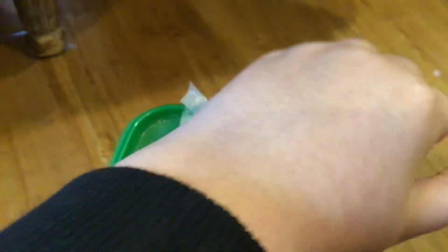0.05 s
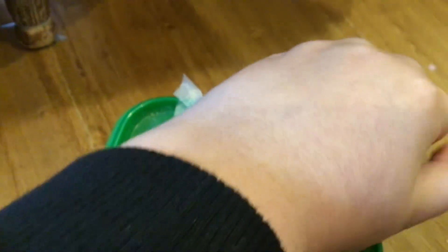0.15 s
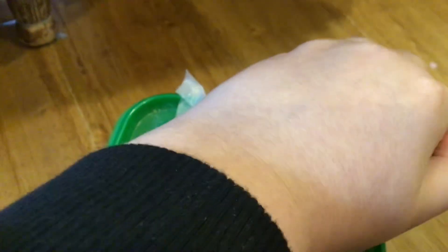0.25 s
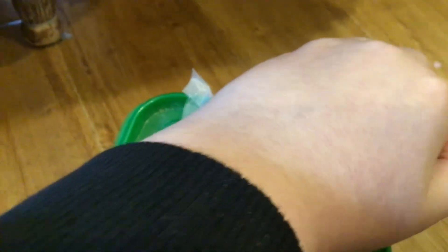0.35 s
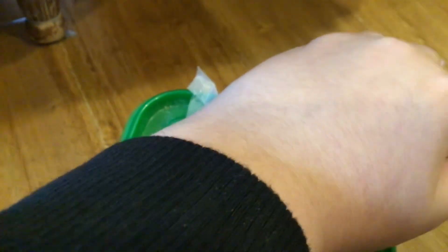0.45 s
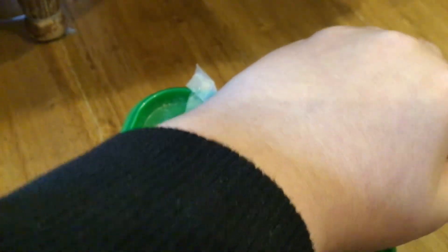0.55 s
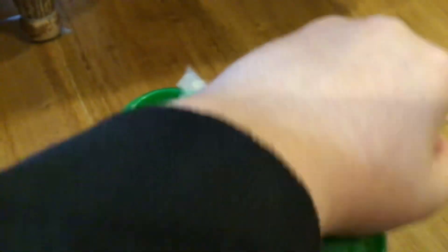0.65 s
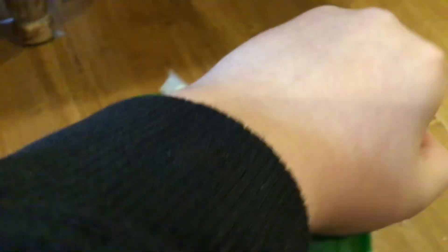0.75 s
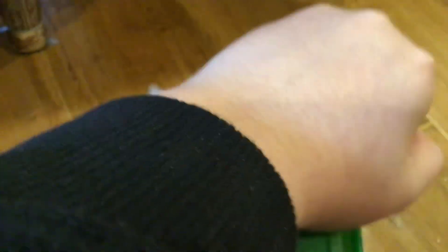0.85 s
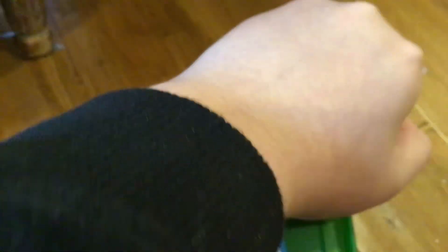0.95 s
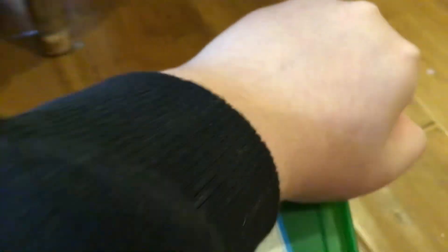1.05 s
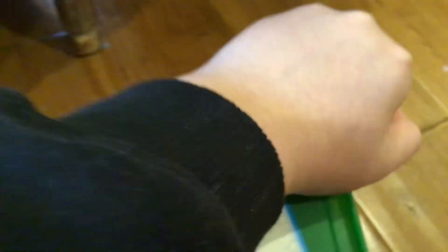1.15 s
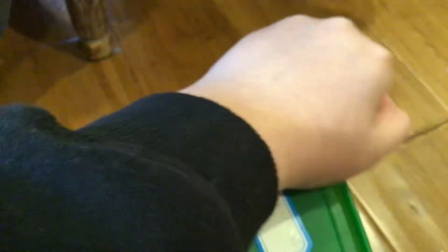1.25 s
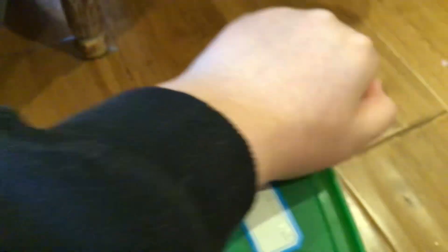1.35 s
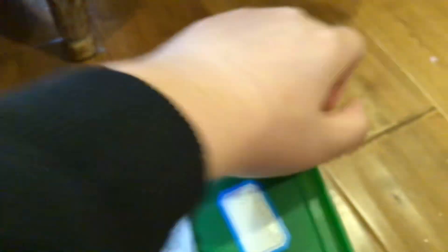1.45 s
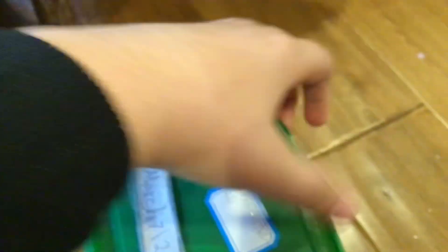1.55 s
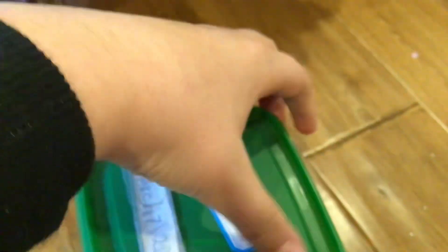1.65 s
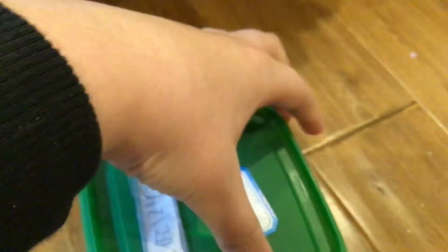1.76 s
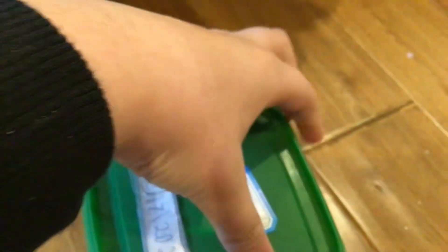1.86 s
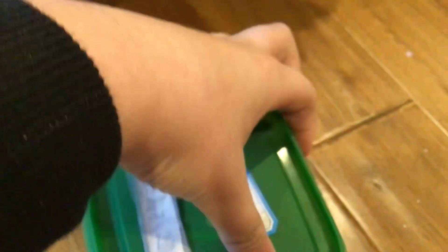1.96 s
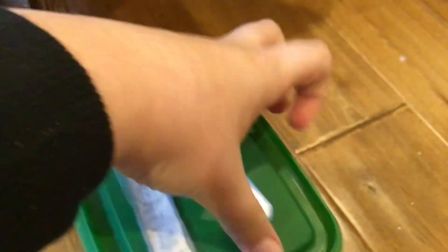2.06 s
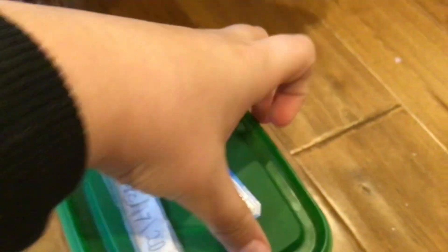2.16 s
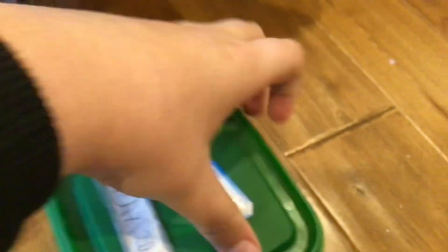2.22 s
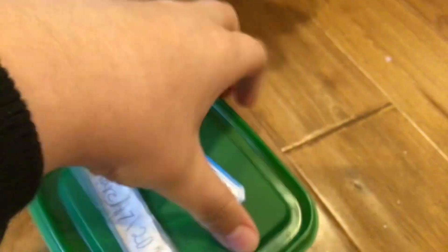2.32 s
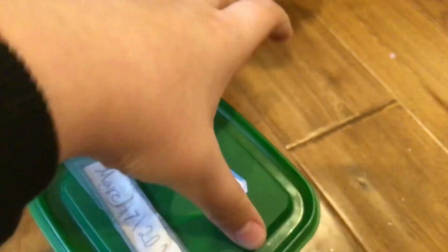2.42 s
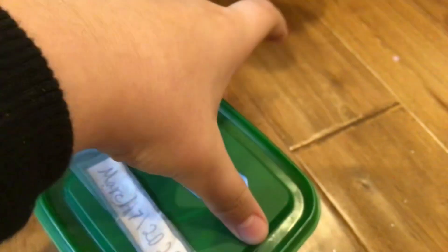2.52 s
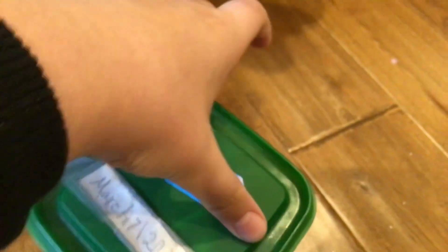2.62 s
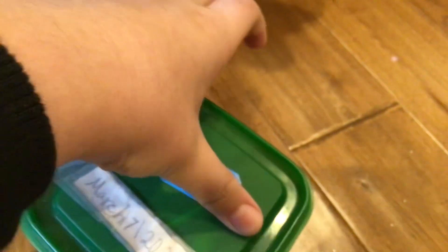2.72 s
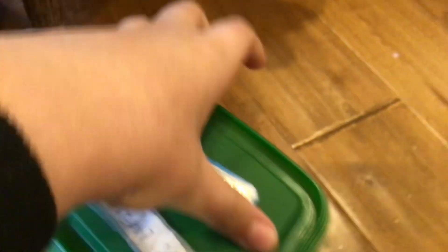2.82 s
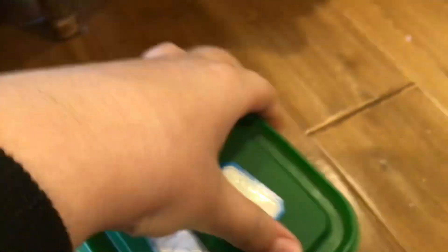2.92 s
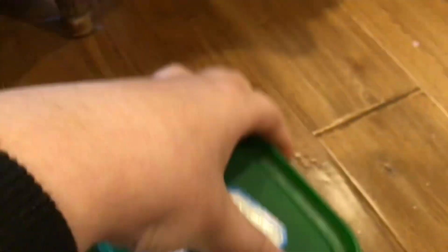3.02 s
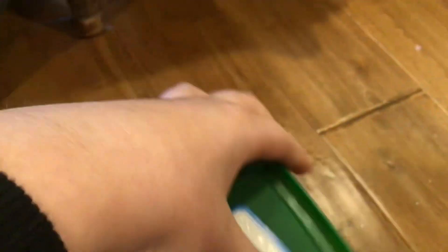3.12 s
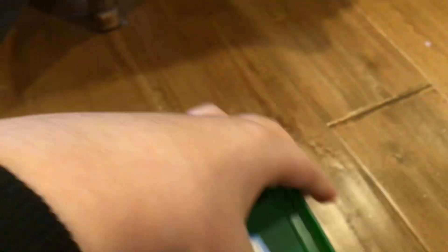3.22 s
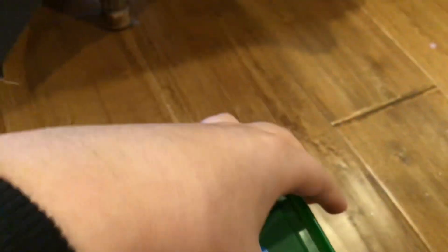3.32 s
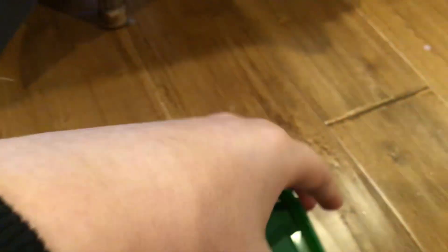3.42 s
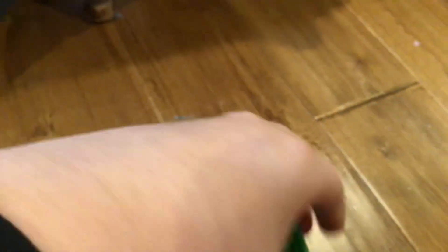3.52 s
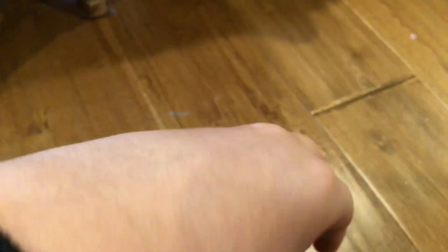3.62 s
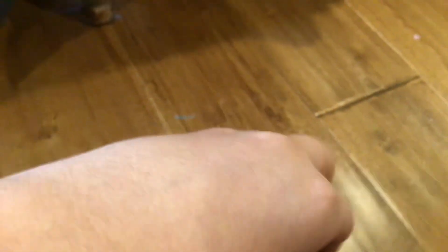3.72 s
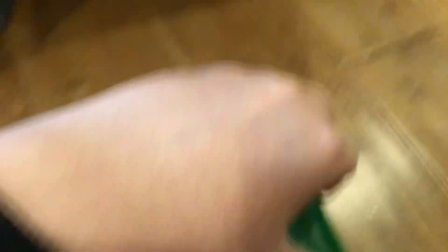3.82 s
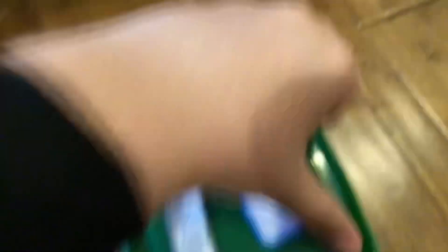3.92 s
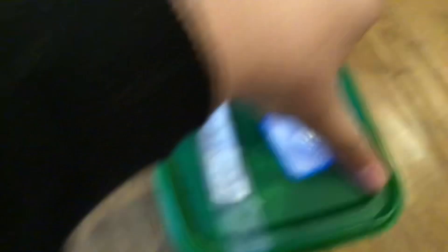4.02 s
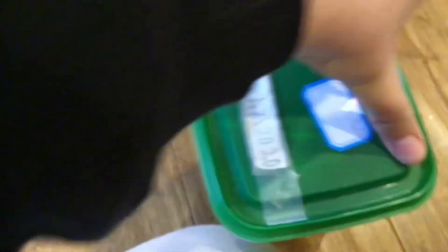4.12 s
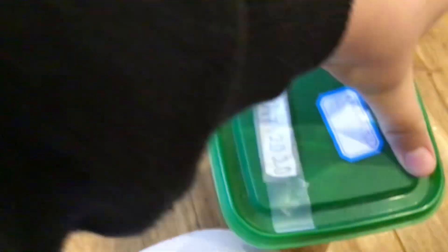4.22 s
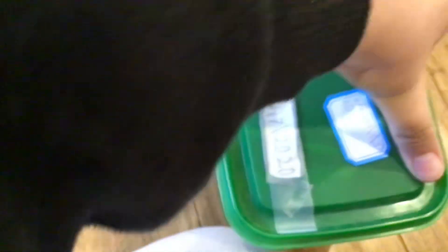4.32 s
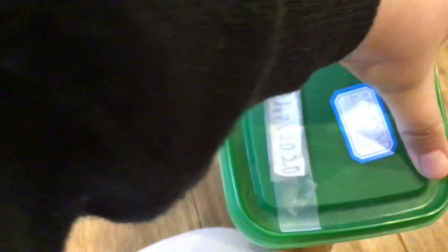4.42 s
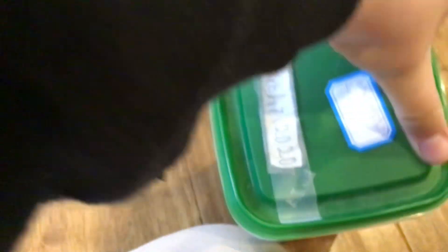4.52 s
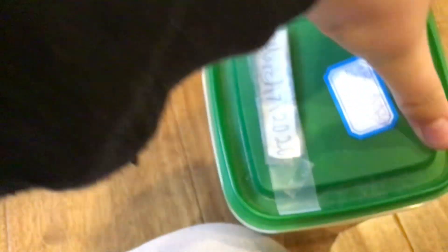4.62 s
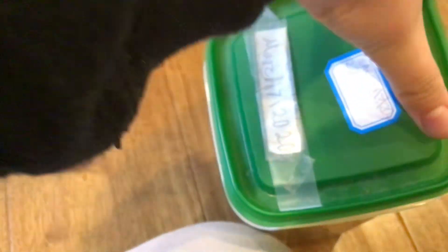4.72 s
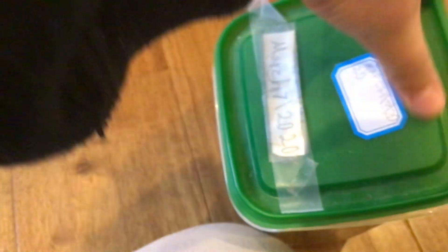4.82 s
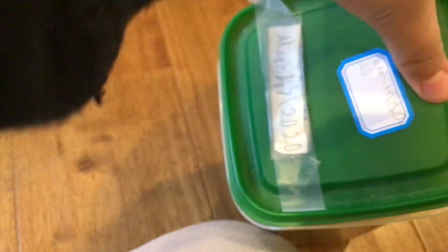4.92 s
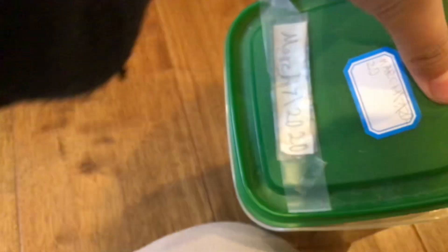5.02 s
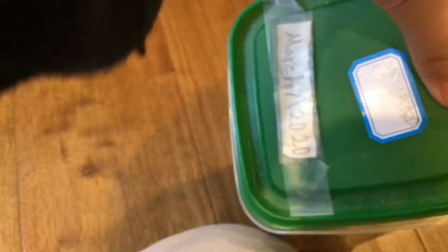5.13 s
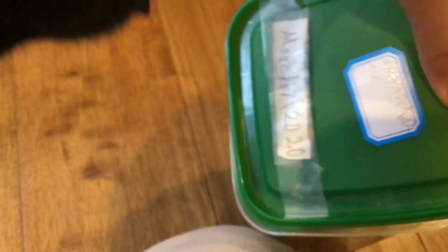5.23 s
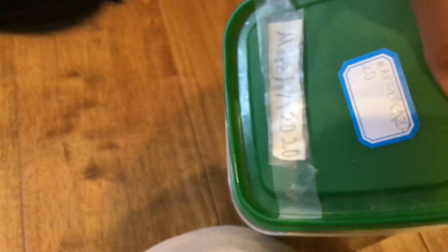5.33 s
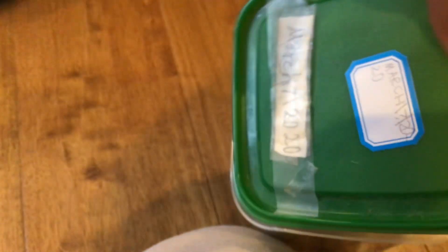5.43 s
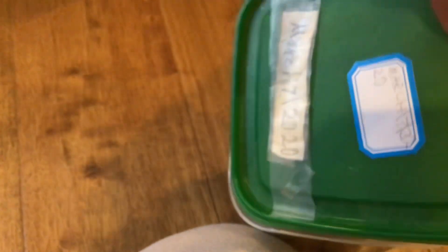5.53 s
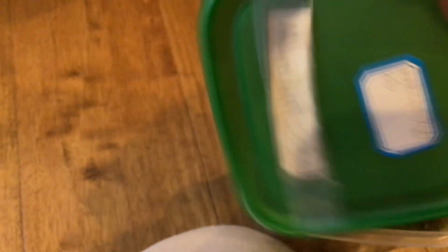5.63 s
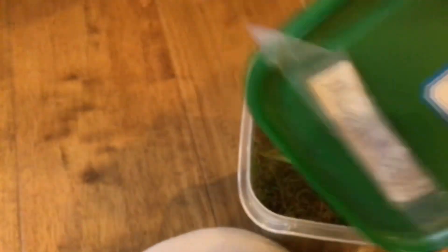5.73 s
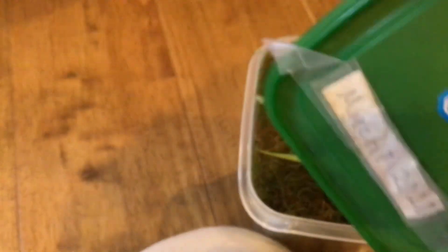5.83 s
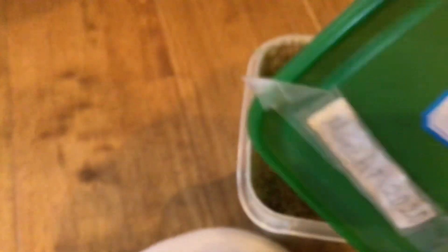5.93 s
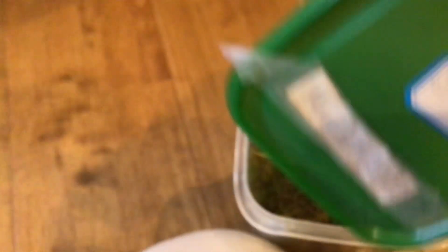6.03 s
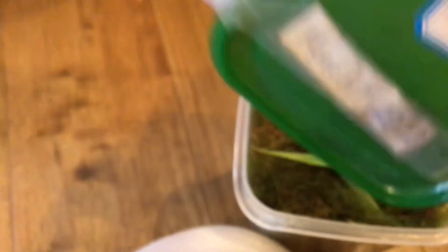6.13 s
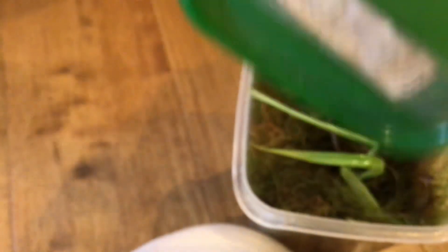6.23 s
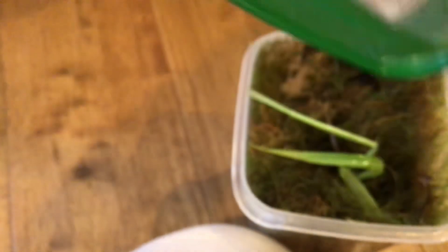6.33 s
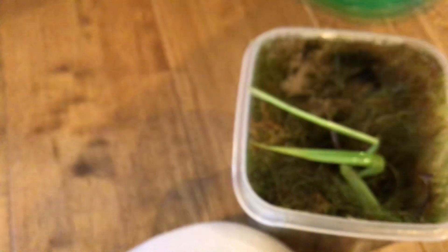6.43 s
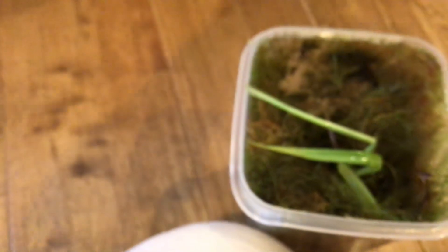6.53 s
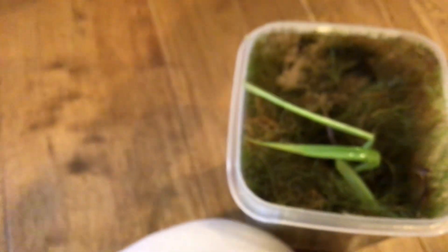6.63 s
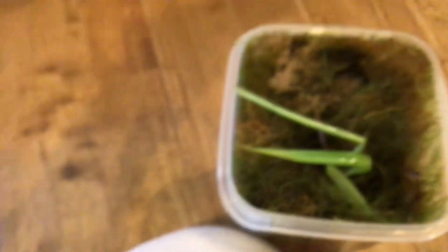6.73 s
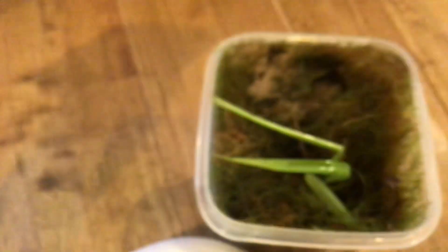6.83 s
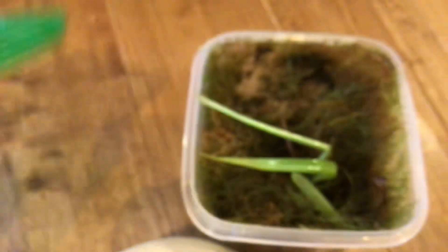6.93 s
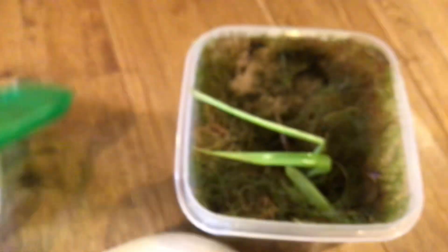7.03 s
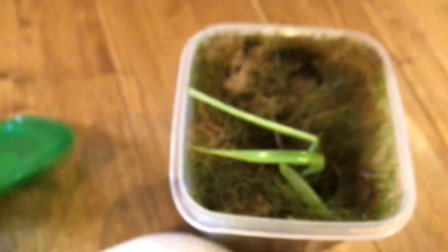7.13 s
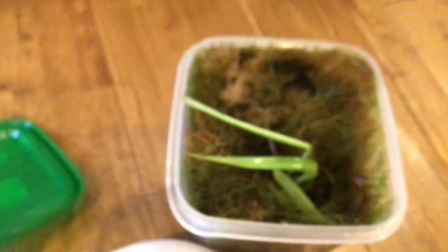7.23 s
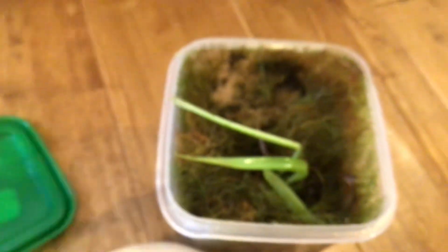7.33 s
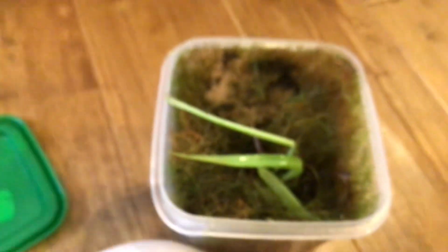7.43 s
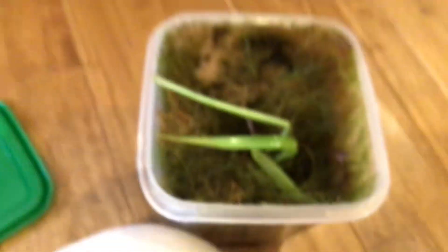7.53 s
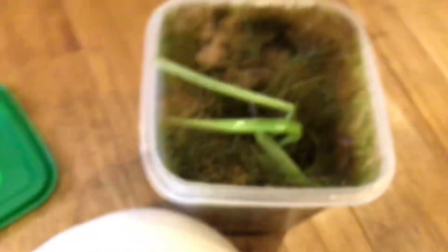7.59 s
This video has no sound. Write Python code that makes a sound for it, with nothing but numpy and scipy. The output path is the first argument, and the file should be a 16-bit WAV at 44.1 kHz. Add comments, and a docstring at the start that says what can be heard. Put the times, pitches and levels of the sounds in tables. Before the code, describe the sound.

Close phone pickup in a small, quiet indoor room, with faint air and low hand rumble. From 0 to 1.4 s a knitted sleeve brushes by in uneven soft rustles, strongest around 0.7 s, with small ticks and dull taps. From 1.4 s fingers feel over a hollow plastic lid: rubbing hiss, creaky panel tones, light pats, and a heavy low double thud near 2.1 s. Busier bumps and slides run from 2.7 to 3.8 s, then sparser knocks around 4.2-4.7 s. After a lull, the rim pops at 5.65-5.75 s in a cluster of hollow knocks, snaps and scraping, trailing light scrapes and sharp ticks to 6.1 s. Near quiet until 7.15 s, when the hard plastic lid slaps wooden boards, then rattles rapidly and brightly at 7.35-7.55 s with a short reverberant tail. A deep thump and brief rub end it at 7.62 s.

```python
"""Working the snap-on lid off a plastic box

A hand works the lid off a plastic food box on a wooden floor, close to a phone. A sleeve brushes past,
fingers rub, knock and tick until the rim pops free; the lid clatters on the boards of a small room.
Blows are short swelling sines that ring panel modes; hard touches are coloured noise bursts.
Friction is random slips shaped stroke by stroke, and the rim's snaps are decaying sines.
A diffuse noise tail makes the room, over quiet air and the rumble of the hand holding the phone."""
import sys
import numpy as np
from scipy import signal
from scipy.fft import rfft, irfft
from scipy.io import wavfile
from scipy.ndimage import uniform_filter1d, map_coordinates

SR = 44100
rng = np.random.default_rng(int(sys.argv[2]) if len(sys.argv) > 2 else 0)


def inscribe(sig):
    """Save sig as 16-bit PCM at rate SR to the path in sys.argv[1].

    A 1-D sig is mono; a 2-D sig holds one channel per row.
    Samples are clipped to [-1, 1] before scaling.
    """
    pcm = np.round(np.clip(np.atleast_2d(sig).T, -1, 1) * 32767)
    wavfile.write(sys.argv[1], SR, pcm.astype(np.int16))


N = 337790
TIME = np.arange(N) / SR


def undb(db):
    """Logarithmic level: convert decibels to amplitude gain."""
    return 10 ** (np.asarray(db) / 20)


def unit(x):
    """Normalisation: scale to rms 1."""
    return x / np.sqrt(np.mean(x ** 2))


def add(track, s, sound):
    """Superposition: mix a sound into a track at time s."""
    start = max(int(s * SR), 0)
    part = sound[:max(N - start, 0)]
    track[start:start + len(part)] += part


def response(points, size=2048):
    """Minimum phase: the causal impulse response of a (frequency [Hz], gain [dB]) spectrum."""
    hz, db = np.transpose(points)
    bins = np.maximum(np.fft.rfftfreq(size, 1 / SR), 1)
    gain_db = np.interp(np.log(bins), np.log(hz), db)
    cepstrum = irfft(np.log(undb(gain_db)))
    # fold the cepstrum onto positive time, which makes the response causal
    cepstrum[1:size // 2] *= 2
    cepstrum[size // 2 + 1:] = 0
    return irfft(np.exp(rfft(cepstrum)))


def colour(x, points):
    """Linear filtering: convolve with the response of a (frequency [Hz], gain [dB]) spectrum."""
    return signal.oaconvolve(x, response(points))[:len(x)]


def band(x, hz, width):
    """Damped resonance: one mode with gain 1 at its centre."""
    hz = min(hz, .45 * SR)
    w = 2 * np.pi * hz / SR
    a = np.sin(w) * width / hz / 2
    return signal.lfilter([a, 0, -a], [1 + a, -2 * np.cos(w), 1 - a], x)


def ring(x, modes):
    """Modal superposition: the sum of what the modes add when driven by x."""
    return sum(undb(db) * band(x, hz, width) for hz, width, db in modes)


def wander(rate):
    """Random modulation: straight lines between normal random values, at rate values per second."""
    knots = rng.standard_normal(4096)
    return np.interp(TIME * rate, np.arange(len(knots)), knots)


# a blow swells for part of its own cycle; a soft fingertip takes longer (levels in dB)
HARD_DB, HARD_CYCLES, SOFT_DB, SOFT_CYCLES = -31.5, 0.55, -44, 0.79


def thud(db, hz, size=6000):
    """Impact pulse: a sine that swells and dies in a few cycles, the fewer the harder the blow."""
    cycles = hz * np.arange(size) / SR
    swell_cycles = np.interp(db, [SOFT_DB, HARD_DB], [SOFT_CYCLES, HARD_CYCLES])
    age = cycles / swell_cycles
    return undb(db) * age * np.exp(1 - age) * np.sin(2 * np.pi * cycles)


# each new hold stiffens the panel differently: spread of its pitch [octaves]
GRIP_DETUNE = 0.062
# modes of the lid's flat panel, seated on the box: (frequency [Hz], width [Hz], relative level [dB])
PANEL = [(400, 44, -4), (656.5, 30, 8), (830, 110, 4.5), (1580, 140, 11)]


def gripped(blow):
    """Stiffness tuning: the panel rings along with a blow, its modes shifted by the hold of the moment."""
    stretch = 2 ** (GRIP_DETUNE * rng.standard_normal())
    modes = [(hz * stretch, width, db) for hz, width, db in PANEL]
    return blow + ring(blow, modes)


# the shell gives briefly under every blow, and then the weight behind it settles; dB relative to the blow
SLAP_HZ, SLAP_DB = 817, -18.5
ROCK_HZ, ROCK_DB, ROCK_LAG_S = 72.9, -17, 0.0029
# dull blows on the box, the boards and the phone, level before the panel rings along:
# (time [s], level [dB], pitch [Hz])
KNOCKS = [(0.622, -38, 412), (.844, -51, 510), (.899, -45, 416), (.9, -46, 900), (0.944, -42.5, 430),
          (1.193, -41, 285), (1.277, -43.5, 266), (1.440, -43.5, 664), (1.441, -35, 292),
          (1.525, -48.5, 298), (1.648, -45, 176), (2.044, -49, 840), (2.05, -24, 133), (2.098, -18.5, 163),
          (2.135, -40, 287), (2.258, -33.5, 202), (2.262, -49.5, 820), (2.444, -41.5, 186),
          (2.741, -42.5, 124), (2.763, -32.5, 230), (2.869, -47, 397), (2.935, -37, 329),
          (2.975, -34.5, 320), (2.993, -41.5, 133), (3.096, -36, 267), (3.556, -46, 297),
          (3.614, -36.5, 245), (3.627, -40, 331), (3.750, -39.5, 285), (3.764, -43, 324),
          (4.234, -44.5, 332), (4.287, -44, 365), (4.439, -37, 199), (4.554, -40.5, 257),
          (4.555, -47.5, 523), (4.657, -32, 242), (4.660, -36, 540), (4.735, -44, 315), (5.301, -39, 292),
          (5.498, -44, 100), (5.6432, -25, 720), (5.644, -24, 326), (5.6472, -22, 340), (5.67, -33.5, 310),
          (5.675, -42.5, 905), (5.698, -28, 236), (5.704, -44, 720), (5.718, -31.5, 240),
          (5.732, -36.5, 696), (5.733, -30, 335), (6.465, -50, 191), (7.159, -26.5, 363),
          (7.217, -34.5, 282), (7.293, -26, 1034), (7.356, -30.5, 326), (7.377, -37.5, 140),
          (7.614, -28, 134), (7.624, -14, 170), (7.625, -31.5, 595), (7.631, -20, 82)]


def knocks():
    """Impact excitation: a pitched blow with a slap on top rings the panel; a low settling follows."""
    out = np.zeros(N)
    for s, db, hz in KNOCKS:
        blow = thud(db, hz) + undb(SLAP_DB) * thud(db, SLAP_HZ)
        add(out, s, gripped(blow))
        add(out, s + ROCK_LAG_S, undb(ROCK_DB) * thud(db, ROCK_HZ))
    return out


# how hard the hand works the lid, as a gain on its creaks and pats: (time [s], level [dB])
PRESS = [(1.352, -63), (2.0, -70), (2.17, -54), (2.48, -71.5), (2.701, -69), (2.94, -61), (3.15, -54.5),
         (3.3, -74.5), (3.53, -53), (4.06, -63), (4.64, -58.5), (4.79, -63), (4.98, -75.5), (5.621, -74)]


def pressure():
    """Load control: a gain that follows the hand's work on the lid, zero before and after."""
    s, db = np.transpose(PRESS)
    working = (TIME > s[0]) * (TIME < s[-1])
    return undb(np.interp(TIME, s, db)) * working


def pats(count=70, pat_db=1, scatter_db=5.0, centre_hz=220, spread_octaves=0.44):
    """Random impacts: fingertips pat the lid lightly, as hard as the hand is working."""
    out, effort = np.zeros(N), pressure()
    times = rng.uniform(PRESS[0][0], PRESS[-1][0], count)
    for s, (strength, pitch) in zip(times, rng.uniform(-2, 1.7, (count, 2))):
        pitch_hz = centre_hz * 2 ** (spread_octaves * pitch)
        pat = gripped(thud(pat_db + scatter_db * strength, pitch_hz))
        add(out, s, effort[int(s * SR)] * pat)
    return out


def contact(chatter, db, tilt, swell_ms, points, modes, pivot_hz=3500):
    """Hard contact: a brief swell of micro-chatter, brighter or duller, wakes the lid's modes."""
    age = 1000 * np.arange(len(chatter)) / SR / max(swell_ms, .1)
    force = age * np.exp(1 - age)
    hz, colour_db = np.transpose(points)
    tilted_db = colour_db + tilt * np.log2(hz / pivot_hz)
    click = colour(force * chatter, np.column_stack([hz, tilted_db]))
    click = click + ring(click, modes)
    return undb(db) * click * np.linalg.norm(force) / np.linalg.norm(click)


# share of its ring, as power, that the shell repeats from touch to touch
ALIKE = .25


def contacts(table, points, modes, size=2048):
    """Modal density: a shell's dense modes answer partly alike at each of a run of hard touches."""
    out, shell = np.zeros(N), rng.standard_normal(size)
    for s, db, tilt, swell_ms in table:
        chatter = np.sqrt(ALIKE) * shell + np.sqrt(1 - ALIKE) * rng.standard_normal(size)
        add(out, s, contact(chatter, db, tilt, swell_ms, points, modes))
    return out


# nails and rim ridges catching on the plastic:
# (time [s], level [dB], tilt [dB per octave], swell [ms], at least 0.1 when played)
TICKS = [(.086, -49.5, -6.5, 1.2), (.313, -52, -3, 3.5), (.472, -45.5, -6.5, 2.3), (.502, -43, -6.5, 1.12),
         (.5985, -38, -6, 1.5), (.622, -36, -8, 0.47), (.844, -50.5, -12, 1.5), (.899, -42.5, -6.5, 1.6),
         (.944, -44.5, -2.5, 0.9), (1.4395, -43, 3, 0.94), (1.532, -50.5, -6.5, 0.78),
         (2.047, -43.5, -2, 1.5), (2.090, -43, 1.5, 2.8), (2.098, -31, 1.5, 1.15),
         (2.15, -46.5, -1.5, 0.85), (2.176, -47.5, -5.5, 1.3), (2.258, -58, 4.5, 3.8),
         (2.399, -53, -6.5, 0.75), (2.740, -40.5, -11.5, 2.1), (2.760, -40, 0, 1.1),
         (3.459, -58, -2.5, 2.5), (3.613, -37, -4, 0.099), (3.908, -45.5, -8.5, 0.65),
         (4.168, -52.5, -2.5, 0.57), (4.2855, -41, -18, 1.7), (4.419, -57.5, -5, 1.3),
         (4.526, -57.5, -9.5, 1.5), (4.658, -47, -7.5, 0.94), (4.6615, -46.5, 7, 1.8),
         (4.7365, -47, 4.5, 1.33), (4.778, -53.5, -0.5, 0.82), (5.06, -51, -7.5, 1.4),
         (5.296, -45.5, -12.5, 0.79), (5.574, -54, -7, 0.89), (5.6415, -47, 3.5, 2.5),
         (5.682, -45, -7.5, 0.35), (5.6952, -34, -7, 0.51), (5.7035, -41, -6, 0.72),
         (5.7125, -46, -2.5, 0.93), (5.732, -45, -3.5, 5.7), (5.8003, -38, 3, 0.75),
         (5.892, -37.5, 5.5, 0.068), (6.028, -51, 0, 0.54), (6.347, -51.5, 6.5, 0.63),
         (6.868, -48.5, 13, 0.68), (7.102, -48.5, 23, 2), (7.6225, -33, -3, 1.9)]
# spectrum of a tick before its tilt: (frequency [Hz], relative level [dB])
TICK_COLOUR = [(60, -72.5), (300, -3.5), (800, 5.5), (2000, 5.5), (3100, 6), (6500, 4.5), (8500, 7),
               (10500, -6), (15500, -15)]


def ticks(panel_db=-13):
    """Damping by contact: while the lid is held its rim is damped and only the panel answers, lightly."""
    modes = [(hz, width, db + panel_db) for hz, width, db in PANEL]
    return contacts(TICKS, TICK_COLOUR, modes)


# after each strike the opposite edge slaps down; hard strikes lose more of their force to flexing
# lag [s], level [dB], growth [dB per dB of the strike], tilt added [dB per octave]
REBOUND_S, REBOUND_DB, REBOUND_GROWTH, REBOUND_TILT_DB = 0.0044, -17, 0.81, -1
# the thrown lid striking the boards: (time [s], level [dB], tilt [dB per octave], swell [ms])
CLATTER = [(7.1567, -14.5, -5.5, 0.5), (7.2164, -23, -3, 0.55), (7.2926, -33, -3, 0.22),
           (7.3405, -30.5, -3.5, 3.1), (7.3547, -11, -1.5, 0.9), (7.3636, -25, -1, 0.48),
           (7.3677, -9.5, -3, 0.26), (7.378, -10, 3, .34), (7.4106, -23.5, -3, 0.47),
           (7.4598, -23.5, -2, 1.1), (7.4743, -10.5, -2.5, 0.18), (7.4775, -22, 0, 0.79),
           (7.4912, -39, -1, 1.1), (7.496, -29, -1.5, .8), (7.502, -38, -4, .8), (7.5325, -32.5, -2, 1.8),
           (7.537, -29.5, -3.5, 0.64), (7.5548, -38.5, -4.5, 0.83)]
# spectrum of a strike on the boards before its tilt: (frequency [Hz], relative level [dB])
BOARD_HIT = [(60, -28.5), (500, -14), (800, -6.5), (1300, -8), (1800, -0.5), (2800, 5), (5000, 5.5),
             (6700, -0.5), (7900, 3), (10200, -8.5), (15000, -12)]
# modes of the stiff rim: (frequency [Hz], width [Hz], relative level [dB])
RIM = [(1820, 82, -3), (1990, 180, 3.5), (2790, 250, -7.5)]


def clatter():
    """Repeated impact: the free lid strikes and rattles, rim ringing, with a slightly duller rebound each."""
    rebounds = []
    for s, db, tilt, swell_ms in CLATTER:
        rebound_db = REBOUND_DB + REBOUND_GROWTH * db
        rebounds.append((s + REBOUND_S, rebound_db, tilt + REBOUND_TILT_DB, swell_ms))
    return contacts(CLATTER + rebounds, BOARD_HIT, RIM)


# the rim snapping, ringing briefly on a note of its own:
# (time [s], starting level [dB], pitch [Hz], time to fall 60 dB [ms])
SNAPS = [(5.696, -31, 2630, 5.8), (5.762, -48, 2440, 59), (7.3411, -20, 1750, 19), (7.4105, -24, 1610, 12)]


def snaps(size=4000):
    """Free decay: the rim's note swells within a cycle and then dies exponentially."""
    out, t = np.zeros(N), np.arange(size) / SR
    for s, db, hz, ring_ms in SNAPS:
        decay = undb(db - 60 * 1000 * t / ring_ms)
        onset = np.minimum(hz * t, 1)
        add(out, s, decay * onset * np.sin(2 * np.pi * hz * t))
    return out


def slips(rate, spread_db, smooth):
    """Stick-slip friction: many tiny slips of uneven size (rate per second) over a smooth hiss."""
    happens = rng.random(N) < rate / SR
    sizes = undb(spread_db * np.minimum(rng.exponential(size=N), 4))
    signs = rng.choice([-1, 1], N)
    return unit(happens * sizes * signs) + smooth * rng.standard_normal(N)


def patchy(points):
    """Position-dependent response: the shell favours slightly other pitches at every place touched."""
    count, patchy_db = 90, 1.8
    hz, db = np.transpose(points)
    grid = np.geomspace(hz[0], hz[-1], count)
    smooth_db = np.interp(np.log(grid), np.log(hz), db)
    return np.column_stack([grid, smooth_db + patchy_db * rng.standard_normal(count)])


ARCH_DB = 3.5  # a stroke is fastest near its middle: fall towards either end
UNEVEN_DB, UNEVEN_RATE = 3, 26  # a hand never slides at a steady speed: dB, changes per s
# low rumble under sliding and grip: (frequency [Hz], relative level [dB])
RUMBLE = [(20, -48.5), (40, -7), (60, 6), (200, 3.5), (300, 1), (500, -30), (16000, -47)]


def sliding(strokes, hiss_colour, body_colour, force, rumble_db, jerk_db, jerk_rate, edge_s, arch_db=ARCH_DB):
    """Sliding friction: the uneven speed of each stroke drives surface hiss, body tone and some rumble."""
    out = np.zeros(N)
    jerks_db, uneven_db = jerk_db * wander(jerk_rate), UNEVEN_DB * wander(UNEVEN_RATE)
    for start, end, hiss_db, body_db, rise_db in strokes:
        begin = max(start - edge_s / 2, 0)
        span = slice(int(begin * SR), int((max(start, end) + edge_s / 2) * SR))
        push, jerks, t = force[span], jerks_db[span], TIME[span]
        moving = np.clip(np.minimum(t - start, end - t) / edge_s + .5, 0, 1)
        way = np.linspace(-.5, .5, len(t))
        speed_db = rise_db * way - arch_db * (2 * way) ** 2 + uneven_db[span]
        speed = moving * undb(speed_db)
        # sticking shakes the body more than it changes the hiss
        hiss = unit(colour(push * undb(jerks / 2), patchy(hiss_colour)))
        body = unit(colour(push * undb(jerks), body_colour))
        body = body + undb(rumble_db) * unit(colour(push, RUMBLE))
        add(out, begin, speed * (undb(hiss_db) * hiss + undb(body_db) * body))
    return out


RUB_BODY_DB = 4  # panel tone under a slide, relative to its hiss
# fingers sliding to a new hold, level before a 0.5 dB lift:
# (start [s], end [s], skin hiss [dB], rise over the slide [dB])
RUB = [(1.802, 1.839, -69, -17), (2.009, 2.185, -66.5, -1.5), (2.337, 2.466, -73, -2),
       (2.67, 2.693, -62.5, -13), (2.711, 2.847, -67, -1), (2.845, 3.15, -59.5, -4.5),
       (3.156, 3.334, -61.5, 5.5), (3.323, 3.546, -72.5, -9.5), (3.563, 3.748, -66.5, 10),
       (3.853, 3.943, -68.5, -7), (3.966, 4.038, -69.5, 3), (4.102, 4.194, -70.5, -5),
       (4.21, 4.245, -60.5, -15), (4.869, 4.95, -69.5, -14), (5.211, 5.274, -72.5, -14),
       (5.282, 5.38, -72, -11), (5.4, 5.531, -67.5, 21), (6.723, 7.069, -83, -2), (7.118, 7.151, -58, -11),
       (7.612, 7.66, -48, 1.5)]
# spectrum of skin hiss on plastic: (frequency [Hz], relative level [dB])
RUB_HISS = [(600, -15), (1200, 5.5), (3000, 7), (6500, 3.5), (9000, 5.5), (11000, -6), (15500, -13)]
# spectrum of the panel tone under the fingers: (frequency [Hz], relative level [dB])
RUB_BODY = [(150, -12.5), (270, 4), (360, 5), (490, -10), (650, -6.5), (1000, -16.5), (1600, -40.5),
            (3000, -74)]


def rubbing():
    """Skin friction: fingers creep over the lid, feeling for a hold, and excite hiss and panel tone."""
    force = slips(rate=600, spread_db=1.0, smooth=1.0)
    slides = [(start, end, db, db + RUB_BODY_DB, rise_db) for start, end, db, rise_db in RUB]
    slid = sliding(slides, RUB_HISS, RUB_BODY, force, rumble_db=-3.5, jerk_db=2.0, jerk_rate=98, edge_s=0.027)
    return undb(0.5) * slid


CREAK_DB, CREAK_HISS_DB = -2.5, -18  # panel tone and hiss, relative to PRESS


def creaking():
    """Stick-slip under load: the gripped panel sticks and slips, louder the harder it is pressed."""
    force = slips(rate=650, spread_db=1.5, smooth=1.0)
    hold = [(PRESS[0][0], PRESS[-1][0], CREAK_HISS_DB, CREAK_DB, 0)]
    # the negative arch makes the long hold louder towards both ends
    creak = sliding(hold, RUB_HISS, RUB_BODY, force, rumble_db=-1.5, jerk_db=11.5, jerk_rate=55,
                    edge_s=0.029, arch_db=-4.5)
    return pressure() * creak


# the lid's edge dragging over the lip of the box, levels before a 1.3 dB lift:
# (start [s], end [s], hiss [dB], panel body [dB], rise over the drag [dB])
SCRAPES = [(4.52, 4.69, -82, -61, 6), (4.985, 5.08, -71.5, -64.5, -1), (5.585, 5.635, -66, -69, -8),
           (5.655, 5.73, -57, -40.5, 0), (5.73, 5.746, -50, -39, 3), (5.76, 5.78, -52.5, -58, -30),
           (5.78, 5.87, -65, -74, -26), (5.87, 5.995, -65, -61, -2), (6.035, 6.085, -63.5, -66, 4.5)]
# spectrum of the scraping hiss: (frequency [Hz], relative level [dB])
SCRAPE_HISS = [(600, 6), (1400, 3), (2100, 4.5), (2900, -1), (3700, 1.5), (5400, 2.5), (7300, -9),
               (8400, 3.5), (10000, -7), (15500, -16.5)]
# spectrum of the panel body under a scrape: (frequency [Hz], relative level [dB])
SCRAPE_BODY = [(150, -1.5), (300, 2), (480, -14), (670, 4.5), (1000, -8.5), (1600, -17), (2300, -21),
               (3500, -29), (12000, -55.5)]


def scraping():
    """Edge friction: the lid judders across the lip of the box, slips of uneven size driving its body."""
    force = slips(rate=470, spread_db=3.0, smooth=0.81)
    judder = sliding(SCRAPES, SCRAPE_HISS, SCRAPE_BODY, force, rumble_db=-4, jerk_db=4.5, jerk_rate=110,
                     edge_s=.015)
    return undb(1.3) * judder


# sweeps of the sleeve, levels before a 1.2 dB lift:
# (start [s], end [s], fibre hiss [dB], cloth body [dB], rise over the sweep [dB])
SLEEVE = [(0, .335, -65.5, -64.5, 6), (.345, .515, -62.5, -54.5, -7), (.585, .64, -61, -60, -4),
          (.635, .72, -65, -57, -6), (.69, .785, -51, -55, 1.5), (.81, .99, -62.5, -72, 2.5),
          (.99, 1.38, -67, -69.5, -11)]
# spectrum of the fibre hiss: (frequency [Hz], relative level [dB])
SLEEVE_HISS = [(700, 1), (1200, 6), (1600, 4), (2300, -1.5), (3400, -2.5), (5000, -2), (7400, -6.5),
               (8400, -6.5), (10500, -13.5), (15500, -25)]
# spectrum of the cloth body: (frequency [Hz], relative level [dB])
SLEEVE_BODY = [(200, -35), (350, 13), (520, 14.5), (800, 7.5), (1150, -2.5), (2500, -32)]


def sleeve():
    """Fibre friction: knitted cloth drags past the phone in many small slips."""
    force = slips(rate=700, spread_db=2.6, smooth=1.0)
    swept = sliding(SLEEVE, SLEEVE_HISS, SLEEVE_BODY, force, rumble_db=-6.5, jerk_db=2.5, jerk_rate=120,
                    edge_s=0.047)
    return undb(1.2) * swept


def flutter(x, depth_db, rate, per_octave=5, size=512):
    """Moving excitation: as the point of contact moves, narrow resonances come and go."""
    hz, s, bands = signal.stft(x, SR, nperseg=size)
    # read a random map along frequency (in steps per octave) and time (in steps per second)
    places = np.meshgrid(per_octave * np.log2(1 + hz / hz[2]), rate * s, indexing="ij")
    drift = map_coordinates(rng.standard_normal((size, size)), places, order=1, mode="mirror")
    gains = undb(depth_db * drift)
    return signal.istft(bands * unit(gains), SR, nperseg=size)[1][:N]


def grit(friction, snag_db, centre_hz, count, scatter_db=2.0, size=700):
    """Asperity impacts: snags ring for a few cycles, as strong as the rubbing under way."""
    out = np.zeros(N)
    effort = np.sqrt(uniform_filter1d(friction ** 2, size=size).clip(0))
    for when, pitch, luck in rng.uniform(.02, 1, (count, 3)):
        hz = centre_hz * 2 ** (2 * pitch - 1)
        turns = hz * np.arange(size) / SR
        strength = effort[int(when * N)] * undb(snag_db - scatter_db * np.log(luck))
        add(out, when * N / SR, strength * turns * np.exp(1 - turns) * np.sin(2 * np.pi * turns))
    return out


# colour of the room's tail: (frequency [Hz], gain [dB])
ROOM_COLOUR = [(40, 6.5), (120, 8), (350, 6.5), (500, -3), (800, 2.5), (2000, -8.5), (5000, -6.5),
               (9000, -7.5), (15000, -13.5)]


def room(x, t60_low=0.55, t60_high=0.43, split_hz=2500, gap_s=0.00097, size=26000):
    """Diffuse reverberation: the decaying noise tail of a small furnished room, treble dying sooner."""
    t = np.arange(size) / SR
    noise = rng.standard_normal(size)
    low = signal.sosfilt(signal.butter(2, split_hz, fs=SR, output="sos"), noise)
    tail = low * undb(-60 * t / t60_low) + (noise - low) * undb(-60 * t / t60_high)
    tail = tail * np.minimum(t / gap_s, 1) ** 2
    return signal.oaconvolve(x, colour(tail / np.linalg.norm(tail), ROOM_COLOUR))[:N]


QUIET_DB = -70.5  # rms level of the room air
# spectrum of the quiet room air: (frequency [Hz], relative level [dB])
QUIET = [(25, -37.5), (60, -8.5), (150, 6), (350, -6), (500, -9), (750, -16), (1200, -23), (4000, -25),
         (8500, -27), (11000, -32.5), (16000, -34.5)]
# faint rumble of the hand that holds the phone, before its drift and a 0.5 dB cut: (time [s], level [dB])
GRIP = [(0.0, -62), (2.86, -69), (5.95, -75.5), (6.42, -72.5), (7.66, -66)]


def background():
    """Stationary and modulated noise: quiet room air, and the drifting rumble of the hand-held phone."""
    s, db = np.transpose(GRIP)
    grip_db = np.interp(TIME, s, db) + 6.2 * wander(36)
    grip = undb(grip_db) * unit(colour(rng.standard_normal(N), RUMBLE))
    air = undb(QUIET_DB) * unit(colour(rng.standard_normal(N), QUIET))
    return undb(-0.5) * grip + air


# the lid lands nearby and skids off into the room: its level into the reverberation, and the time taken
LANDING_ROOM_DB, AWAY_ROOM_DB, SKID_S = -8, -7, 0.13


def scene():
    """Direct-to-reverberant balance: close handling is nearly dry; the thrown lid fills the room."""
    blows, clicks, lid = knocks() + pats(), ticks() + snaps(), clatter()
    cloth, skin, creak = sleeve(), rubbing(), creaking()
    friction = flutter(cloth + skin + creak, depth_db=2.5, rate=42)
    friction = friction + flutter(scraping(), depth_db=6.0, rate=35)
    # snags on threads and ridges, then brighter ones on tape
    ridges = grit(cloth + skin + creak, snag_db=-7, centre_hz=1097, count=480)
    tape = grit(skin + creak, snag_db=-6, centre_hz=6080, count=300)
    lid_room_db = np.interp(TIME - CLATTER[0][0], [0, SKID_S], [LANDING_ROOM_DB, AWAY_ROOM_DB])
    handling_send = undb(-21.0) * blows + undb(-11.5) * clicks + undb(-17) * friction
    reverb = room(handling_send + undb(lid_room_db) * lid)
    return (blows + clicks + lid + friction + ridges + tape + reverb + background())[None]


TOP_HZ = 16000


def record(dry, low_cut_hz=56):
    """Band limiting: the phone thins the deep bass and cuts the top."""
    thin = signal.sosfilt(signal.butter(2, low_cut_hz, "high", fs=SR, output="sos"), dry)
    return signal.sosfilt(signal.ellip(8, .2, 70, TOP_HZ, fs=SR, output="sos"), thin)


dry = scene()
out = record(dry)
inscribe(out)
```